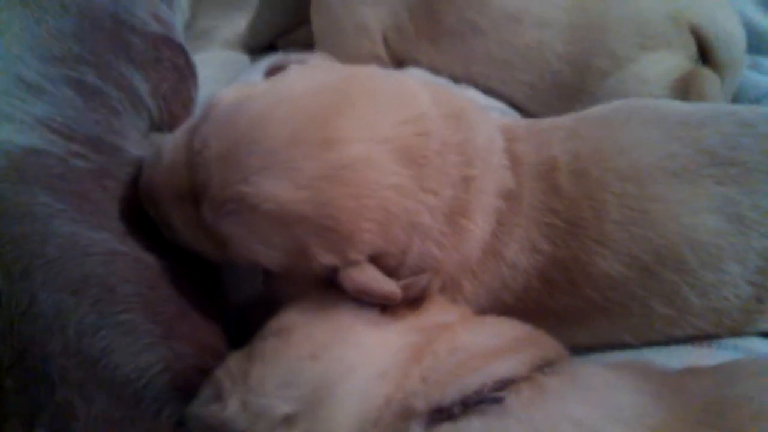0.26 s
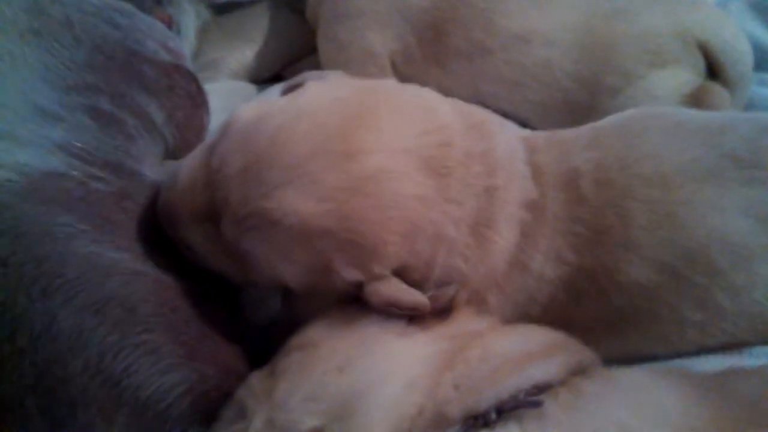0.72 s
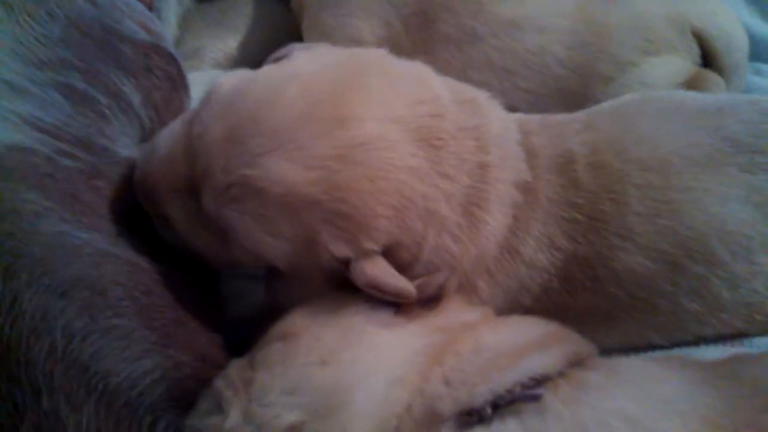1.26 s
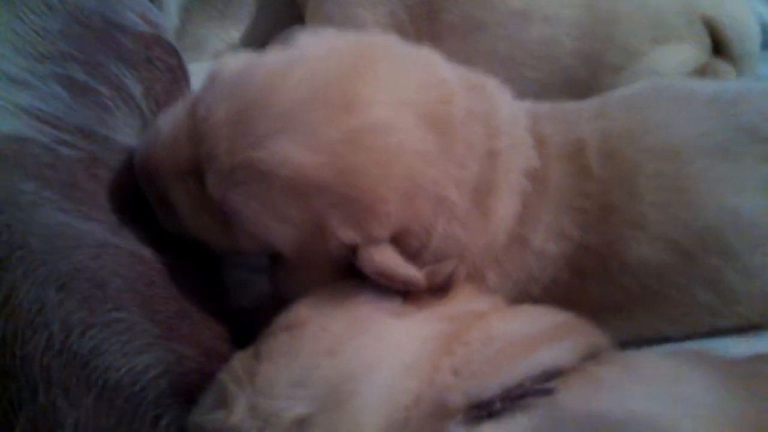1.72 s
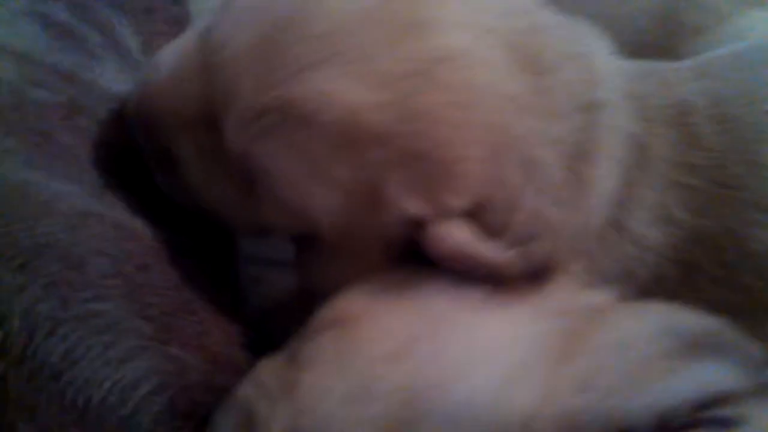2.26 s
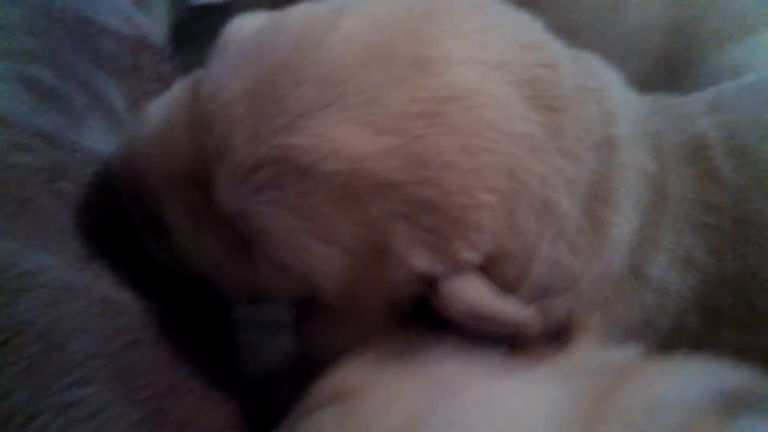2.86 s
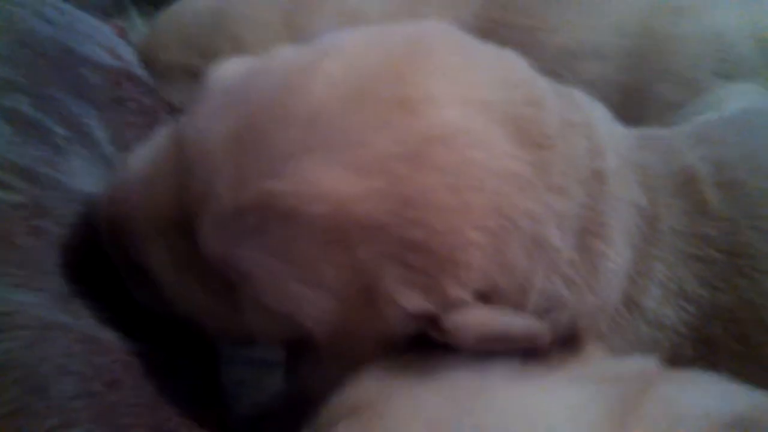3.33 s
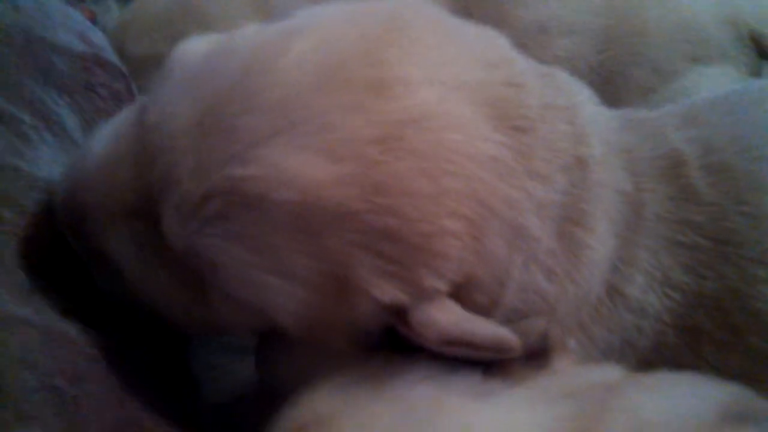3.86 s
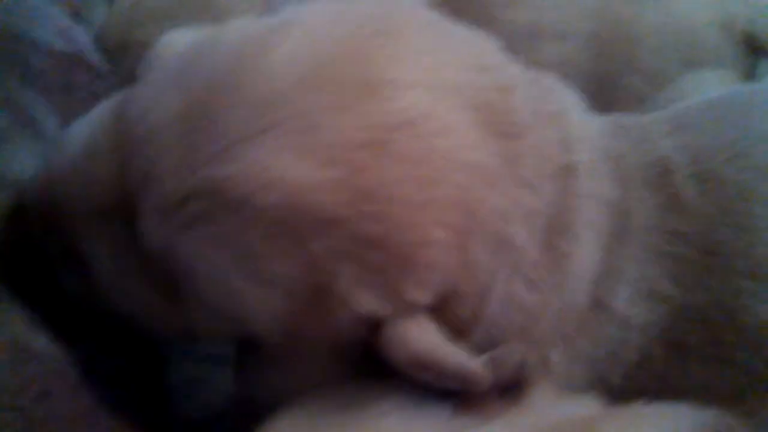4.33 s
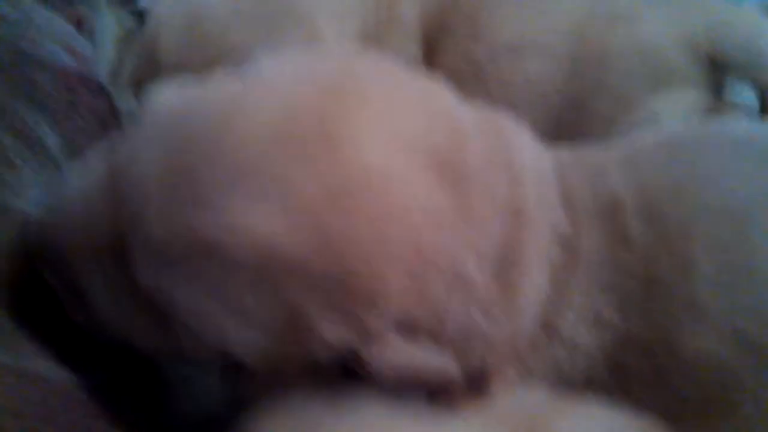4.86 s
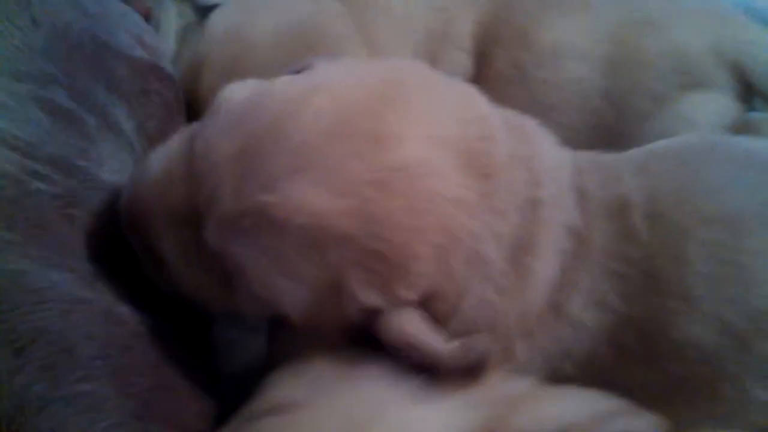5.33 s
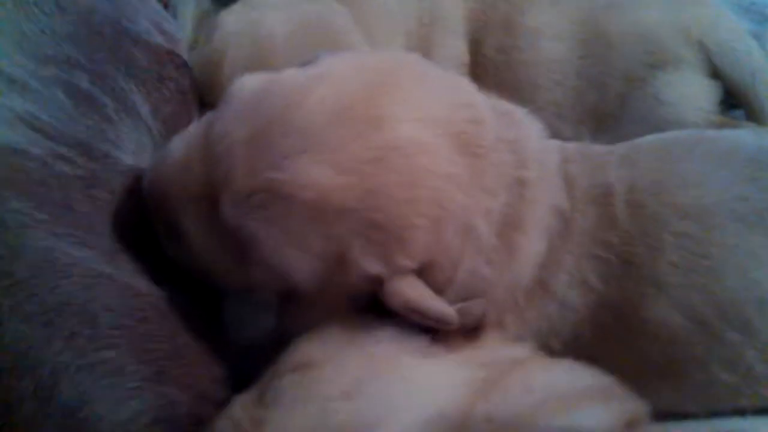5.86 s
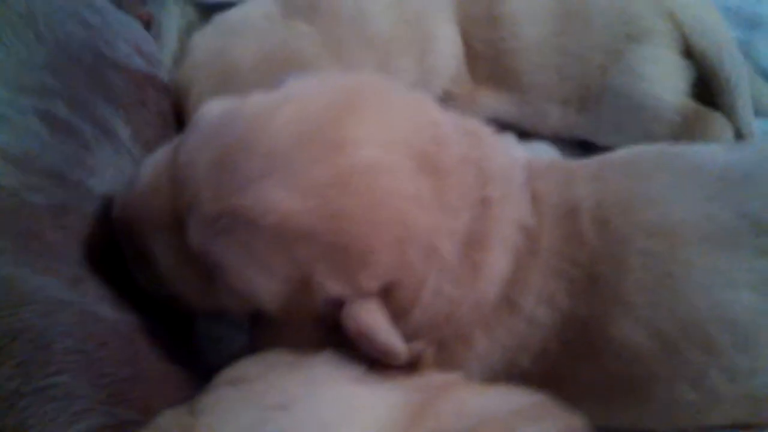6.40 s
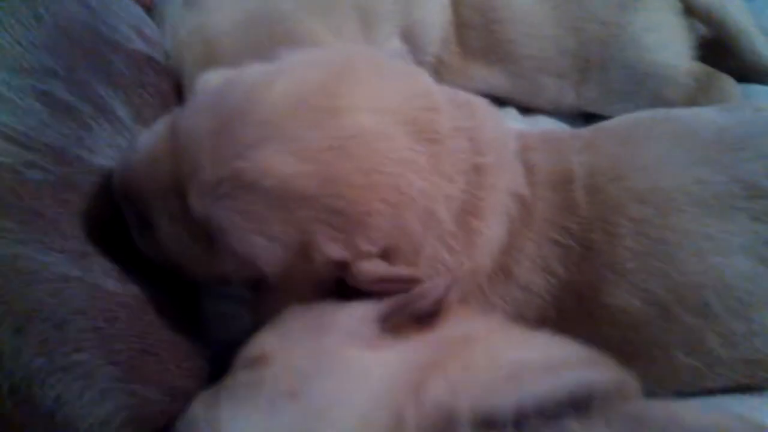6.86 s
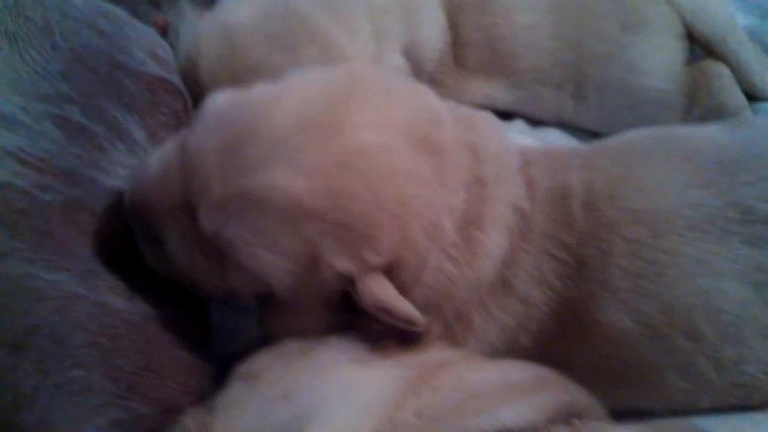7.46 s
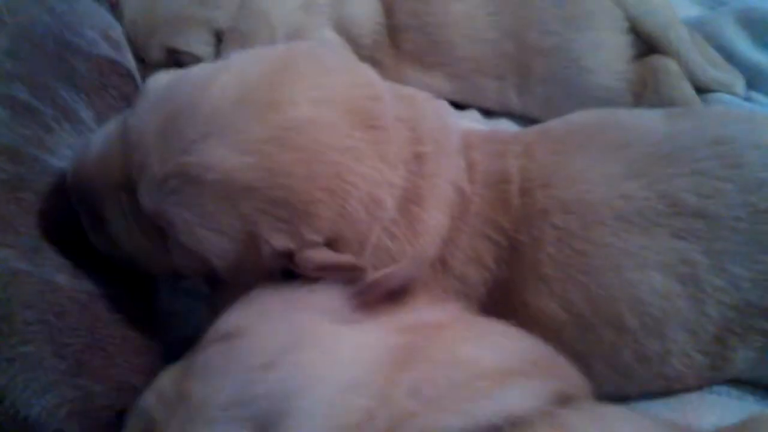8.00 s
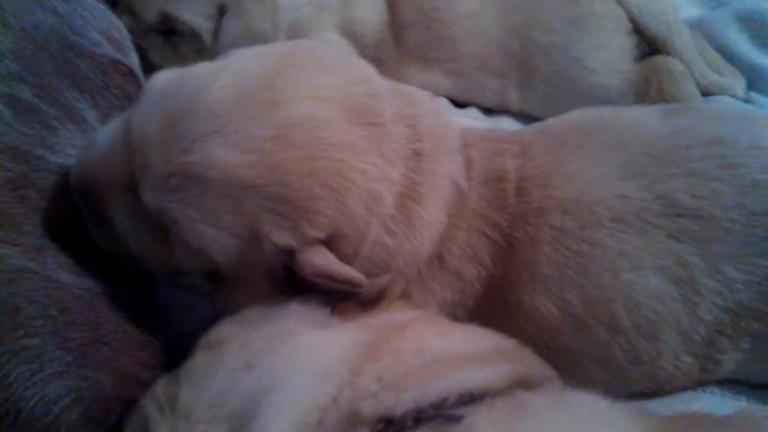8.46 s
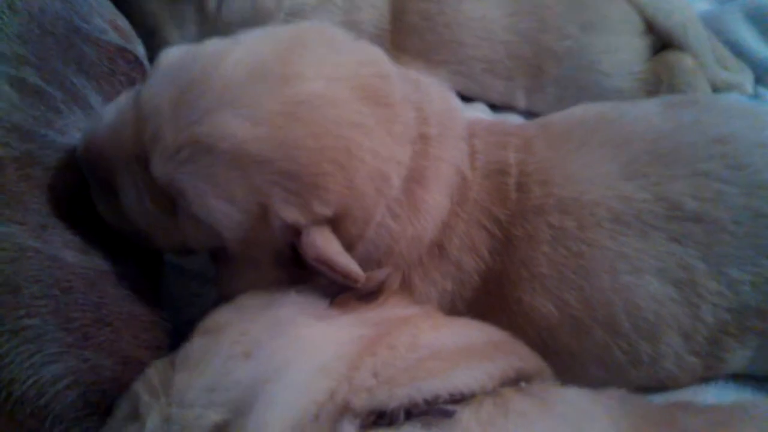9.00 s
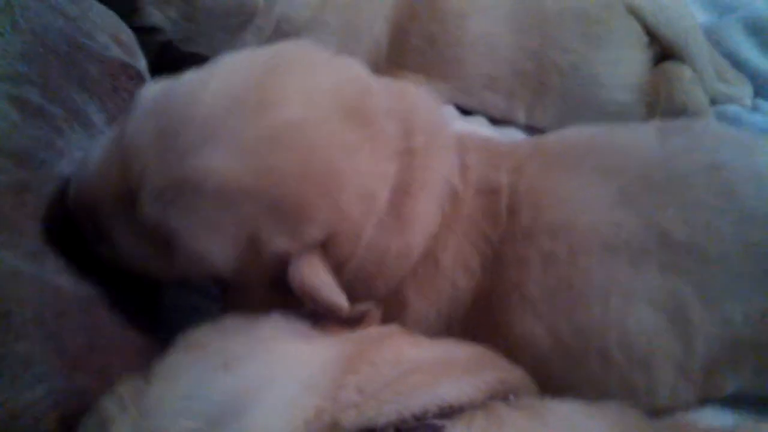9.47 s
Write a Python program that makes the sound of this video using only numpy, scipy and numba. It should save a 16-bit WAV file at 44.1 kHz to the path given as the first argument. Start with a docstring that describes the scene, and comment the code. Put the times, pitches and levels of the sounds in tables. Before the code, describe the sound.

Very close to the microphone, a newborn puppy whines in five bouts, its small voice flipping between clear squeals, lower buzzing cries and brief rasps, each ending in a quick upward flick. After about five and a half seconds the crying stops, leaving short soft grunts and squeaks, snuffling in fur, wet mouth clicks and faint bumps over quiet indoor room noise.

```python
"""Newborn puppy whining

A newborn puppy lies against its mother, close to the microphone, and whines in five bouts: pulses of its
vocal folds excite throat, mouth and nose. The voice flips between a pure squeal, lower cries of grouped
beats and a rasp, then settles into short grunts and squeaks. Wet mouth clicks, bumps, snuffling in
the fur and shifting bedding, all made of shaped noise, lie over a quiet room."""
import sys
import numpy as np
from scipy import signal
from scipy.fft import rfft, irfft, next_fast_len
from scipy.io import wavfile
from scipy.ndimage import uniform_filter1d
from numba import njit

SR = 44100
rng = np.random.default_rng(int(sys.argv[2]) if len(sys.argv) > 2 else 0)


def output_pcm(signal):
    """Save a mono or channel-first signal as 16-bit PCM at the path in sys.argv[1].

    Samples are clipped to [-1, 1] before scaling.
    """
    pcm = np.clip(np.atleast_2d(signal).T, -1, 1) * 32767
    wavfile.write(sys.argv[1], SR, np.round(pcm).astype(np.int16))


N = 428652
T = np.arange(N) / SR


def undb(db):
    """Logarithmic level: decibels to amplitude gain."""
    return 10 ** (np.asarray(db) / 20)


def curves(rows):
    """Linear interpolation: each column after the time as one value per sample."""
    times, *columns = np.transpose(sorted(map(tuple, rows)))
    return [np.interp(T, times, column) for column in columns]


def spectrum(points, size):
    """Frequency response: gain of (frequency [Hz], level [dB]) points on the bins of a transform."""
    hz, db = np.transpose(points)
    bin_hz = np.arange(size // 2 + 1) * SR / size
    return undb(np.interp(np.log(bin_hz + 1), np.log(hz), db))


def colour(x, points):
    """Minimum-phase filtering: folding the cepstrum makes the given spectrum causal."""
    cepstrum = irfft(np.log(spectrum(points, size=2048)))
    cepstrum[1:1024] *= 2
    cepstrum[1024:] = 0
    impulse_response = irfft(np.exp(rfft(cepstrum)))
    return signal.fftconvolve(x, impulse_response)[:len(x)]


def unit(x):
    """Normalisation: scale by the standard deviation to 1."""
    return x / (np.std(x) + 1e-12)


def steady(x):
    """Power normalisation: hold the short-term rms at 1."""
    power = uniform_filter1d(uniform_filter1d(x * x, size=380), size=260)
    return x / np.sqrt(np.abs(power) + 1e-14)


def walk(rate):
    """Low-pass fluctuation: smooth random wander at a rate [1/s], spread near 1."""
    hold = max(int(SR / rate), 2)
    steps = np.repeat(rng.standard_normal(N // hold + 1), hold)
    return unit(uniform_filter1d(steps, hold)[:N])


def envelope(s, length, attack_s, release_s):
    """Amplitude envelope: straight attack, hold, exponential release."""
    attack = np.clip((T - s) / attack_s, 0, 1)
    return attack * np.exp(-np.clip((T - s - length) / release_s, 0, 20))


def swells(rows, attack_s, release_s):
    """Power addition: joint gain of (time [s], length [s], level [dB]) bursts of noise."""
    return np.sqrt(sum((undb(db) * envelope(s, length, attack_s, release_s)) ** 2 for s, length, db in rows))


def add(out, s, x):
    """Superposition: mix a short sound in at time s."""
    i = max(int(s * SR), 0)
    out[i:i + len(x)] += x[:N - i]


@njit
def resonate(x, hz, width):
    """Resonance: state-variable band-pass with a moving centre [Hz] and a fixed width [Hz]."""
    y, band, low = np.empty(len(x)), 0., 0.
    for i in range(len(x)):
        g, damping = np.tan(np.pi * hz[i] / SR), width / hz[i]
        v = (band + g * (x[i] - low)) / (1 + g * (g + damping))
        band, low, y[i] = 2 * v - band, low + 2 * g * v, damping * v
    return y


def folds(hz, group, depth, rough, jitter, shimmer):
    """Self-oscillation: one pulse per beat of the vocal folds; weak beats drop the pitch, uneven ones rasp."""
    n = len(hz)
    phase = np.cumsum(hz) / SR + .7
    beat = np.arange(1, int(phase[-1]) + 1)
    at = np.interp(beat, phase, np.arange(n))
    i = at.astype(int)
    size_chance, time_chance, slip_chance = rng.standard_normal((len(beat), 3)).T
    # rough folds now and then slip a beat, which breaks the pattern of strong and weak
    stumble = np.abs(slip_chance) * rough[i] > .62
    slips = np.cumsum(stumble & ~np.roll(stumble, 1))
    weak = (beat + slips) % group[i] > 0
    size = (1 - depth[i] * weak) * np.exp(shimmer * rough[i] * size_chance)
    at = at + jitter * rough[i] * time_chance * SR / hz[i]
    # a windowed sinc places each pulse between samples
    taps = at.astype(int)[:, None] + np.arange(-7, 9)
    off = taps - at[:, None]
    shape = np.sinc(off) * np.cos(np.pi * off / 16) ** 2
    return np.bincount((taps % n).ravel(), (size[:, None] * shape).ravel(), n)


def puffs(pulses, decay_s):
    """Turbulence: air noise released by each pulse."""
    release = signal.lfilter([1], [1, -np.exp(-1 / (decay_s * SR))], pulses)
    return unit(release * rng.standard_normal(len(pulses)))


# room noise before a common trim: (time [s], level [dB])
ROOM_LEVEL = [(0, -50), (1.6, -48.5), (2.5, -51.5), (3.3, -53), (3.52, -59), (4.75, -48), (4.95, -41),
              (5.5, -41), (5.75, -46), (6.4, -46), (6.7, -49), (8.8, -50.5), (9.4, -48.5)]
# shifts of the bedding before a common trim: (time [s], length [s], level [dB])
BEDDING_SHIFTS = [(4.99, .39, -36.5), (5.45, 0.35, -49), (6.0, 0.076, -43), (6.29, 0.21, -52),
                  (6.79, 0.14, -53), (7.24, 0.14, -50.5), (9.14, .07, -56)]
# soft, hollow rushing between the calls: (time [s], length [s], level [dB])
HOLLOW_RUSHES = [(1.44, 0.19, -55), (9.38, 0.21, -51)]
# colours of bedding and room: (frequency [Hz], level [dB])
BEDDING_SPECTRUM = [(20, -25.5), (60, -15.5), (130, -14), (220, -8.5), (380, -12), (600, -36), (1200, -49),
                    (3000, -42)]
ROOM_SPECTRUM = [(20, -39), (60, 10.5), (130, 3.5), (400, -3.5), (900, -9), (1400, -12.5), (2200, -16),
                 (3500, -18.5), (7000, -28.5), (11000, -28.5), (15500, -24)]


def background(bedding_db=-1, resting_db=-8.0, room_db=-1, rush_hz=950):
    """Broadband noise: uneven low rubbing of the bedding and hollow rushes over soft room noise."""
    air_db, = curves(ROOM_LEVEL)
    shifts = swells(BEDDING_SHIFTS, attack_s=0.041, release_s=0.027)
    moving = np.hypot(shifts, undb(air_db + resting_db))
    rustle_db = 2 * walk(40)
    rub = unit(colour(rng.standard_normal(N), BEDDING_SPECTRUM)) * moving * undb(bedding_db + rustle_db)
    hollow = unit(resonate(rng.standard_normal(N), np.full(N, float(rush_hz)), 260.0))
    rush = hollow * swells(HOLLOW_RUSHES, attack_s=0.092, release_s=0.066)
    room = unit(colour(rng.standard_normal(N), ROOM_SPECTRUM)) * undb(air_db + room_db + 1.6 * walk(22))
    return rub + rush + room


def echo(x, t60_s=0.19, wet_db=-25):
    """Reverberation: convolution with the short, dull noise tail of a furnished room."""
    t = T[:SR // 2]
    decay = undb(-60 * t / t60_s) * (t > .005)
    tail = colour(rng.standard_normal(len(t)) * decay, [(200, 0.0), (2000, 1.0), (10000, -18.5)])
    return signal.fftconvolve(x, tail / np.linalg.norm(tail))[:N] * undb(wet_db)


# snuffles of the muzzle in fur, before a common lift: (time [s], length [s], level [dB])
FUR_SNUFFLES = [(4.56, 0.071, -46.5), (4.91, .14, -42), (5.06, 0.022, -28), (5.1, 0.298, -36),
                (5.44, 0.099, -42), (5.765, 0.069, -44.5), (5.92, 0.072, -55), (6.065, 0.04, -47.5),
                (6.34, 0.036, -44), (6.46, 0.073, -43.5), (6.52, 0.06, -39), (6.77, 0.12, -53.5),
                (6.864, 0.078, -38.5), (6.95, 0.081, -49.5), (7.15, 0.13, -58), (7.32, 0.032, -51),
                (7.47, 0.088, -50.5), (7.71, 0.06, -45.5), (8.048, 0.018, -48), (8.33, 0.025, -52),
                (8.53, 0.13, -57), (8.87, 0.17, -53), (8.985, 0.069, -40), (9.17, 0.1, -54.5),
                (9.44, .07, -58)]
# colour of the hiss: (frequency [Hz], level [dB])
FUR_SPECTRUM = [(1200, -7), (2500, -5.5), (3800, -1), (5000, -3.5), (6500, 3.5), (8000, -1), (9500, 2),
                (11500, -3), (13500, 5), (15300, 2)]
# from then on the muzzle rests in the fur and never quite stops rubbing (level before the lift)
FUR_FROM_S, FUR_DB = 4.6, -63


def snuffle(gain_db=1, flutter_db=1.5):
    """Friction noise: fluttering hiss of the muzzle working through fur."""
    bursts = swells(FUR_SNUFFLES, attack_s=0.019, release_s=0.022)
    gain = np.hypot(bursts, undb(FUR_DB) * (T > FUR_FROM_S))
    hiss = unit(colour(rng.standard_normal(N), FUR_SPECTRUM))
    return hiss * gain * undb(gain_db + flutter_db * walk(150))


# wet clicks of tongue and lips, before a common lift: (time [s], peak level [dB])
WET_CLICKS = [(2.03, -15), (2.345, -24), (2.392, -24), (3.314, -32), (3.3357, -24), (3.342, -13),
              (4.066, -26), (5.075, -24), (5.758, -30), (5.784, -23.5), (5.953, -35), (6.469, -24),
              (6.779, -29), (6.825, -42), (7.337, -25), (7.979, -17.5), (8.04, -36), (8.056, -26),
              (8.067, -43), (8.352, -34), (8.364, -43), (9.175, -27.5)]
# colour of the clicks: (frequency [Hz], level [dB])
CLICK_SPECTRUM = [(1000, -41), (3500, -18), (7000, -8.5), (11000, 0), (15000, 0)]
# soft bumps of paws and muzzle: (time [s], peak level [dB], centre frequency [Hz])
SOFT_BUMPS = [(5.08, -36, 89.9), (5.615, -34.5, 450), (5.782, -35, 600), (5.955, -34, 500),
              (6.01, -35.5, 250), (6.061, -33, 250), (6.522, -40, 350), (6.825, -30, 159),
              (6.825, -28, 1200), (6.844, -45, 70), (7.155, -37, 397), (7.171, -38, 300),
              (7.846, -42.5, 500), (8.109, -38, 450), (8.177, -39.5, 240), (8.348, -38, 794),
              (8.9, -47, 65), (8.997, -29, 597), (9.141, -39, 596)]


def nuzzling(bump_s=0.0041, click_db=3):
    """Impulse excitation: wet films snap in a fraction of a millisecond; bumps on soft bodies are damped."""
    out, t = np.zeros(N), T[:SR // 20]
    for s, db in WET_CLICKS:
        snap = np.exp(-t / .0003) + .06 * np.exp(-t / .002)
        click = colour(rng.standard_normal(len(t)) * snap, CLICK_SPECTRUM)
        add(out, s, click * undb(db + click_db) / np.abs(click).max())
    for s, db, hz in SOFT_BUMPS:
        knock = rng.standard_normal(len(t)) * np.exp(-t / bump_s)
        bump = resonate(knock, np.full(len(t), float(hz)), float(hz))
        add(out, s, bump * undb(db) / np.abs(bump).max())
    return out


# grunts and squeaks, level before a common lift: (time [s], length [s], middle pitch [Hz],
# glide over the length [Hz], level [dB], mouth resonance [Hz], roughness [0-1])
GRUNTS_AND_SQUEAKS = [(5.791, 0.036, 328.5, 72, -33, 624, 0.67), (6.247, 0.042, 438, -140, -41, 920, 0.5),
                      (6.306, 0.026, 305, -150, -47, 300, 0.26), (6.432, 0.095, 225, -41, -36, 560, 0.5),
                      (6.776, .014, 275, -55, -42.5, 348, 0.8), (6.939, .012, 487, 0, -41.5, 730, 0.7),
                      (6.979, 0.054, 294.5, -79.5, -38.5, 870, 0.77), (7.335, .02, 221, -28, -50, 280, 0.5),
                      (7.729, .02, 431, -27, -40.5, 560, 0.44), (7.968, 0.055, 471, 79.5, -36, 500, 0.31),
                      (8.551, 0.049, 436.4, 88, -36.5, 470, 0.46),
                      (8.961, 0.036, 511, 110, -43, 1030, 0.28), (9.08, 0.061, 211, 22, -45, 905, 0.34),
                      (9.132, 0.013, 607, -51, -38, 620, 0.3), (9.166, 0.054, 279.4, -77.5, -35, 650, 0.68),
                      (9.192, 0.07, 426, 86, -36.5, 435, .2)]
# throat behind the nearly closed mouth: (frequency [Hz], level [dB])
GRUNT_THROAT_SPECTRUM = [(100, -11.5), (250, 6.5), (450, 5.5), (800, 2), (1400, -2.5), (2000, -2),
                         (3000, -24), (6500, -19), (10000, -13), (15000, -43)]
GRUNT_SKEW, GRUNT_TAPER = 0.66, 1.04  # the push of a grunt peaks early and tapers off


def grunts(mouth_width_hz=200, boost_db=10, gain_db=1):
    """Source and filter: a short run of slack fold beats through a nearly closed mouth."""
    out, ring = np.zeros(N), np.zeros(SR // 50)
    for s, length, pitch_hz, glide_hz, db, mouth_hz, rough in GRUNTS_AND_SQUEAKS:
        u = np.linspace(0, 1, int(length * SR))
        one = np.ones(len(u))
        hz = pitch_hz + glide_hz * (u - .5)
        pulses = folds(hz, one, one, rough * one, jitter=.13, shimmer=.6)
        pressure = np.abs(np.sin(np.pi * u ** GRUNT_SKEW)) ** GRUNT_TAPER
        breath = (.1 + .55 * rough) * puffs(pulses, decay_s=.001)
        push = (unit(pulses) + breath) * pressure
        throat = colour(np.r_[push, ring], GRUNT_THROAT_SPECTRUM)
        # the mouth closes toward the end and leaves only its resonance
        opening = np.r_[1 - u ** 3, ring]
        mouth = resonate(throat, np.full(len(throat), float(mouth_hz)), float(mouth_width_hz))
        x = throat * opening + undb(boost_db) * mouth
        add(out, s, x * undb(db + gain_db) / np.sqrt(np.sum(x * x) / len(u)))
    return out


# bouts of whining: (start [s], end [s], closing upward flick [Hz], mid-bout treble relative to the level [dB],
# growth of the treble over the bout [dB])
WHINE_BOUTS = [(-0.02, 0.356, 200.3, -12.5, -5), (0.658, 1.43, 130, -13, 1), (1.702, 3.244, 209.9, -14, 1),
               (3.579, 4.59, 89.6, -13, 2), (4.956, 5.425, 259.5, -13.5, -6.5)]
# pitch that the fold tension would give as a pure squeal, one curve per bout: (time [s], pitch [Hz])
SQUEAL_PITCH = [
    [(0, 989), (.03, 927), (.06, 954), (.17, 940.5), (.205, 987), (.26, 866), (.318, 739), (.33, 632)],
    [(.68, 799.5), (.755, 939.6), (.79, 888), (.86, 920), (.905, 1085), (.98, 1120), (1.075, 1085),
     (1.105, 1163), (1.2, 1056), (1.275, 843), (1.32, 993), (1.41, 1020), (1.42, 777)],
    [(1.77, 739.4), (1.85, 835.4), (1.895, 840), (1.92, 757), (1.97, 789), (2.015, 725), (2.07, 824),
     (2.14, 673), (2.2, 632.5), (2.26, 700), (2.34, 666), (2.39, 703.5), (2.46, 678.6), (2.52, 740.6),
     (2.62, 767), (2.69, 654.6), (2.81, 655.6), (2.91, 717.7), (3.02, 730), (3.1, 759), (3.2, 701),
     (3.22, 614)],
    [(3.58, 785), (3.68, 857), (3.82, 880.5), (3.9, 959), (3.955, 974.5), (4.03, 919.5), (4.073, 914),
     (4.14, 949), (4.24, 893), (4.43, 913), (4.5, 788), (4.55, 760), (4.563, 676)],
    [(4.95, 729.8), (5.07, 834), (5.13, 773), (5.19, 844.7), (5.25, 796), (5.31, 788.5), (5.395, 611)],
]
# effort and mouth shape, one curve per bout:
# (time [s], level [dB], mouth resonance [Hz], boost of the resonance [dB])
EFFORT_AND_MOUTH = [
    [(0, -24.5, 1780, 16), (.06, -26.5, 1700, 10), (.21, -26, 1546, 16), (.35, -27.5, 1400, 11.5)],
    [(.68, -26.5, 1440, 8), (.71, -21.5, 941, 13), (.79, -29.5, 1450, 4), (.865, -24.5, 1514, 19),
     (.96, -20.5, 1560, 11.5), (1.06, -23, 2150, 18), (1.16, -24, 1597, 12), (1.275, -26, 1400, 15.5),
     (1.42, -22.5, 1590, 14)],
    [(1.78, -32, 1392, 7), (1.85, -22, 1738, 9.5), (2.06, -24, 2000, 9), (2.14, -22, 1706, 13),
     (2.23, -24, 1684, 9.5), (2.4, -20.5, 1791, 16.5), (2.56, -21, 1723, 13), (2.78, -21.5, 1683, 11),
     (2.88, -21, 1763, 12), (3.1, -21, 1972, 16), (3.25, -25.5, 1692, 4.5)],
    [(3.6, -29.5, 1708, 6), (3.69, -29.5, 1613, -10), (3.85, -28, 1515, 10), (3.93, -23.5, 1823, 9.5),
     (4.12, -23, 1800, 7), (4.25, -23, 1320, 7), (4.35, -22.5, 1850, 6), (4.43, -17.5, 1802, 10),
     (4.5, -21.5, 1590, 7.5), (4.58, -22, 1490, 5.5)],
    [(4.96, -26.5, 1277, 14), (5.02, -22, 1336, 6.5), (5.14, -26, 1303, 13), (5.28, -23, 1620, 7.5),
     (5.42, -23.5, 1359, 13)],
]
ATTACK_S, RELEASE_S = .003, 0.0099
CATCH_S, CATCH_DB = .027, -2  # the folds catch, rough and weak, as a bout starts
FLICK_LEAD_S, FLICK_S, CLOSING_DB = .03, .05, 23  # at the end the pitch flicks up and the mouth shuts


def bouts():
    """Muscular control: each bout catches, follows pitch and effort, shifts in treble, ends in a flick."""
    controls = np.zeros((6, N))
    for bout, pitch, effort in zip(WHINE_BOUTS, SQUEAL_PITCH, EFFORT_AND_MOUTH):
        start, end, flick_hz, treble_db, brighten_db = bout
        hz, = curves(pitch)
        db, mouth_hz, boost_db = curves(effort)
        closing = np.clip((T - end + FLICK_LEAD_S) / FLICK_S, 0, 1)
        progress = np.clip((T - start) / (end - start), 0, 1)
        gain = undb(db) * envelope(start, end - start, ATTACK_S, RELEASE_S)
        catch = np.exp(-np.minimum(((T - start) / CATCH_S) ** 2, 20))
        edge_db = treble_db + brighten_db * (progress - .5)
        current = np.array([hz + flick_hz * closing, gain * undb(CATCH_DB * catch), mouth_hz,
                            boost_db - CLOSING_DB * closing, edge_db, catch])
        # each bout takes over from the one before
        controls = np.where(T >= start - CATCH_S, current, controls)
    return controls


# breaks out of the squeal, where only the first beat of each group stays strong and the folds may slow:
# (start [s], end [s], group size [beats], weakening of the other beats [0-1], fold rate over the squeal's [ratio],
# roughness [0-1])
VOICE_BREAKS = [(0.184, 0.213, 2, 0.98, 0.98, 0.07), (0.214, 0.326, 2, 1, 0.78, 0.2),
                (0.758, 1.011, 2, 1, .78, .05), (1.13, 1.418, 2, 1, 0.77, .13),
                (1.69, 1.811, 4, .91, 1, .85), (1.811, 1.841, 2, 0.62, 0.99, .4),
                (1.9, 2.581, 2, 0.93, 1, .02), (2.634, 3.037, 2, 0.86, 1, 0.03),
                (3.153, 3.223, 2, 1, 0.97, .12), (3.702, 3.897, 2, 1, 0.82, 0.18),
                (3.949, 4.001, 2, 1, .82, 0.21), (4.076, 4.133, 2, 1, 0.81, 0.21),
                (4.153, 4.28, 2, 1, 0.83, .12), (4.941, 5.33, 3, 0.96, 1, .33),
                (5.331, 5.383, 2, 0.99, 1, .4)]
# rasps, where the beats grow uneven and settle again: (middle [s], half length [s], added roughness [0-1])
VOICE_RASPS = [(0.336, .02, .35), (0.819, .05, 0.28), (1.2, .04, .45), (1.345, .02, .35),
               (1.395, 0.0251, .2), (1.919, .02, 0.23), (2.248, .085, .5), (2.79, .045, .55),
               (4.294, .015, 0.21), (5.05, .08, .27), (5.3, .025, .25)]
SQUEAL_WEAKENING, SQUEAL_ROUGH = 0.033, 0.01239
CATCH_WEAKENING, CATCH_ROUGH = 0.83, .8
RASP_EVENING = 0.41  # a rasp blurs strong and weak beats


def register(catch):
    """Subharmonics: grouping, weakening, rate and roughness of folds that squeal unless they catch, break or rasp."""
    state = np.outer([2, SQUEAL_WEAKENING, 1, SQUEAL_ROUGH], np.ones(N))
    for start, end, *broken in VOICE_BREAKS:
        state[:, int(start * SR):int(end * SR)] = np.array(broken)[:, None]
    group, depth, slowing, rough = state
    rasp = sum(amount * np.exp(-np.minimum(((T - s) / half) ** 2, 20)) for s, half, amount in VOICE_RASPS)
    depth = np.maximum(depth * (1 - RASP_EVENING * rasp), CATCH_WEAKENING * catch)
    rough = np.maximum(rough + rasp, CATCH_ROUGH * catch)
    depth, rough = (uniform_filter1d(np.clip(c, 0, 1), size=300) for c in (depth, rough))
    return group, depth, slowing, rough


# throat, and the airy edge from the nose: (frequency [Hz], level [dB])
THROAT_SPECTRUM = [(120, -16), (300, -1.5), (450, -1), (700, 5.5), (900, -0.5), (1150, 0.5), (1450, -6.5),
                   (1800, -2.5), (2200, -7), (2600, -31.5), (3200, -35), (5000, -75)]
TREBLE_SPECTRUM = [(2000, -34), (3000, -15.5), (3900, -7), (4800, -18.5), (5500, -3.5), (6400, 2),
                   (7600, -4.5), (8800, 5), (10300, -0.5), (11400, -14), (15500, -16.5)]
LURCH = .035  # slow stagger of the pitch at full roughness, as a share of it
NASAL_TURN, NASAL_RATE = 1.09, 9  # how far (radians) and how often (per s) the nasal passages change shape
TREBLE_SWELL_DB, TREBLE_SWELL_RATE = 1.5, 12  # the airy edge swells and fades (rate per s)


def whines(mouth_width_hz=340):
    """Source and filter: fold pulses ring the throat and the moving mouth resonance under a thin, airy edge."""
    hz, gain, mouth_hz, boost_db, edge_db, catch = bouts()
    group, depth, slowing, rough = register(catch)
    # the pitch always wavers a little, and lurches when the folds are rough
    waver = 1 + .002 * walk(90) + LURCH * rough * walk(60) + .1 * rough ** 1.7 * walk(200)
    hz = uniform_filter1d(hz * slowing, size=300) * waver
    pulses = folds(hz, np.maximum(np.rint(group), 1), depth, rough, jitter=.11, shimmer=.3)
    hiss = steady(puffs(pulses, decay_s=.0008))
    turbulence = .01 + .55 * rough * (1 - .5 * rough)
    source = steady(pulses) + turbulence * hiss
    # the tiny mouth radiates no steady flow and no bass
    source = signal.sosfilt(signal.butter(4, 210, "high", fs=SR, output="sos"), source)
    throat = colour(source, THROAT_SPECTRUM)
    mouth = resonate(throat, mouth_hz, float(mouth_width_hz))
    body = steady(throat + (undb(boost_db) - 1) * mouth)
    # the folded nasal passages scatter each pulse over a few milliseconds;
    # as they flex, other overtones stand out
    scatter = rng.standard_normal((2, 400)) * np.exp(-T[:400] / .0028)
    first_path, second_path = (signal.fftconvolve(pulses, s)[:N] for s in scatter)
    flex = NASAL_TURN * walk(NASAL_RATE)
    nasal = np.cos(flex) * first_path + np.sin(flex) * second_path
    air = .2 + 1.8 * rough
    edge = steady(colour(steady(nasal) + air * hiss, TREBLE_SPECTRUM))
    edge_gain = undb(edge_db + TREBLE_SWELL_DB * walk(TREBLE_SWELL_RATE))
    flutter_db = .8 * rough * walk(110)
    return (body + edge_gain * edge) * gain * undb(flutter_db)


# how unlike the two ports hear the puppy: (frequency [Hz], difference over sum [dB])
PUPPY_PORT_DIFFERENCE = [(100, -37), (350, -9.5), (700, -13), (1200, -2.5), (1750, 8), (2300, 14.5),
                         (3500, -5.5), (4500, -6), (5400, 12), (6300, -1.5), (9000, -1), (15000, -0.5)]
PORT_LAG = 16  # samples


def ports(x, difference):
    """Differential pickup: a close pair, widened by feeding each port, delayed and inverted, to the other channel."""
    size = next_fast_len(N + SR // 10, True)
    lag = np.exp(-2j * np.pi * np.arange(size // 2 + 1) * PORT_LAG / size)
    feed = .93
    mid = 1 - feed * lag
    side = (1 + feed * lag) * spectrum(difference, size)
    sound = rfft(x, size) / np.hypot(np.abs(mid), np.abs(side))
    return np.array([irfft(sound * (mid + side), size)[:N], irfft(sound * (mid - side), size)[:N]])


def scene():
    """Direct and diffuse fields: the puppy close and to one side, two mirrored room fields around it."""
    puppy = snuffle() + nuzzling() + grunts() + whines()
    room_difference = [(100, -5.5), (400, -7.0), (900, -2.5), (2000, 1), (15000, -2.5)]
    first, second = (ports(background() + echo(puppy), room_difference) for _ in range(2))
    around = (first + second[::-1]) / np.sqrt(2)
    return ports(puppy, PUPPY_PORT_DIFFERENCE)[::-1] + around


# sensitivity of left over right: (frequency [Hz], level [dB])
LEFT_OVER_RIGHT = [(60, -0.5), (200, -2), (380, 1.5), (600, 2.5), (800, 4.5), (1100, 4), (1350, -0.5),
                   (1600, -6.5), (2100, -2.5), (2600, -0.5), (3100, -3), (4400, 1.5), (6300, -3),
                   (8000, -0.5)]
TOP_HZ = 15750


def record(dry):
    """Transducer response: the two channels differ a little in colour; the top is cut steeply."""
    size = next_fast_len(N + SR // 10, True)
    ratio = spectrum(LEFT_OVER_RIGHT, size)
    gains = np.array([ratio, np.ones(len(ratio))]) * np.sqrt(2 / (1 + ratio ** 2))
    x = irfft(rfft(dry, size) * gains, size)[:, :N]
    return signal.sosfilt(signal.ellip(10, .2, 80, TOP_HZ, fs=SR, output="sos"), x)


dry = scene()
out = record(dry)
output_pcm(out)
```